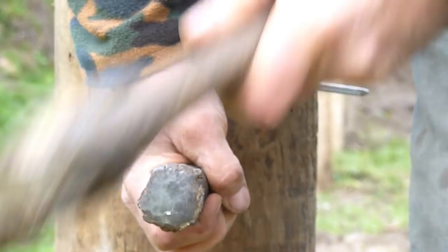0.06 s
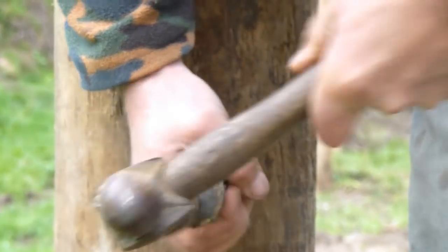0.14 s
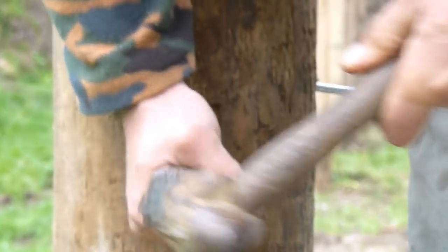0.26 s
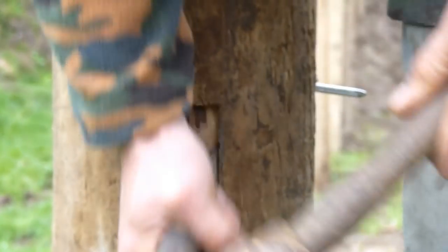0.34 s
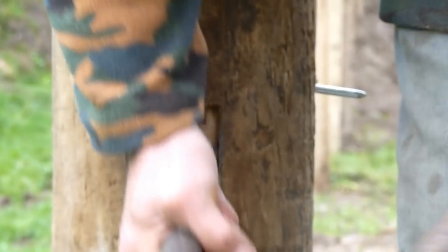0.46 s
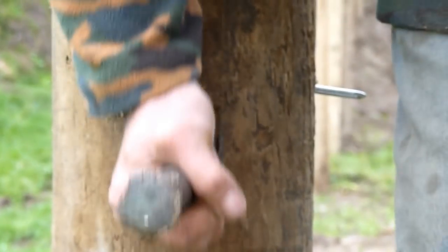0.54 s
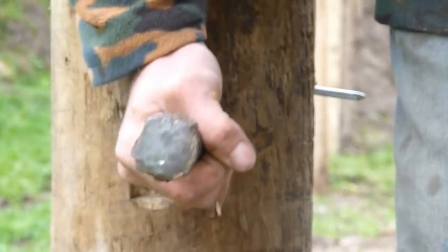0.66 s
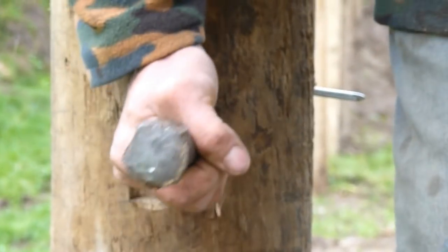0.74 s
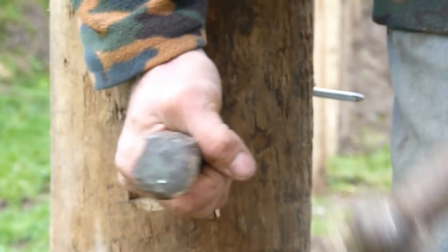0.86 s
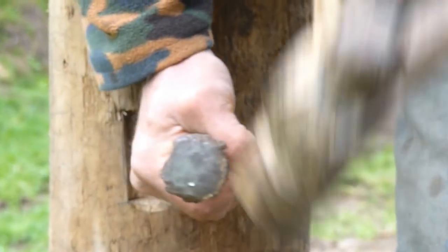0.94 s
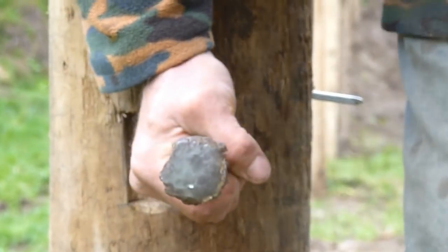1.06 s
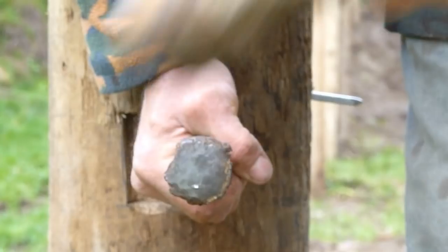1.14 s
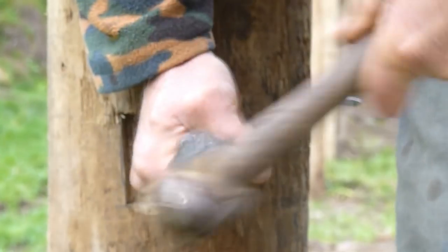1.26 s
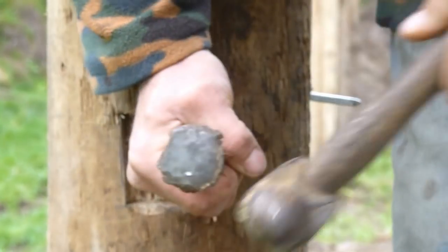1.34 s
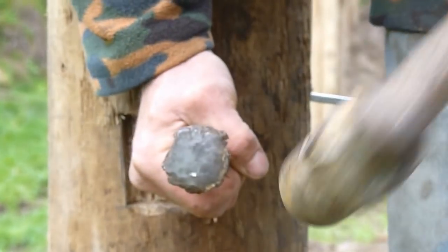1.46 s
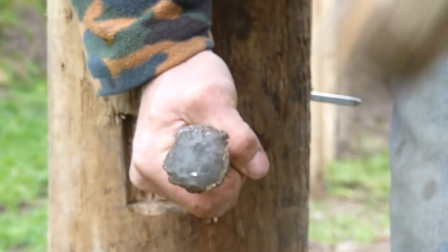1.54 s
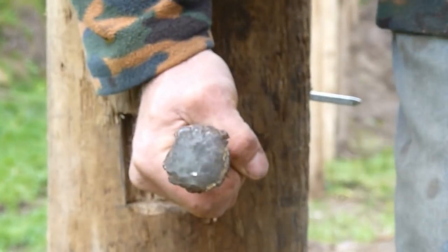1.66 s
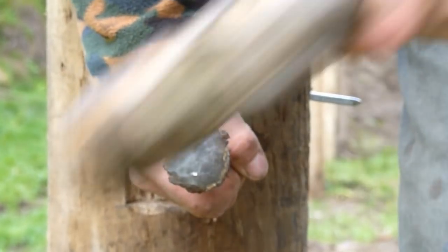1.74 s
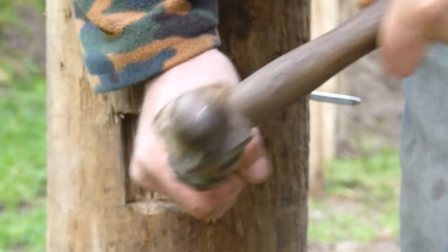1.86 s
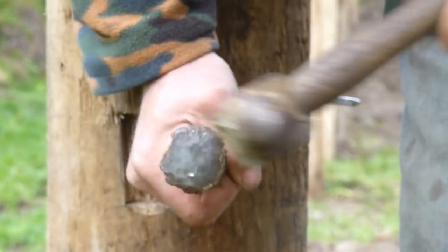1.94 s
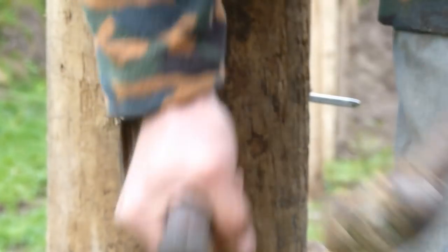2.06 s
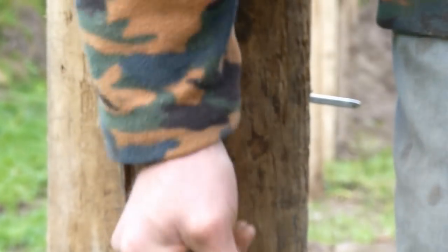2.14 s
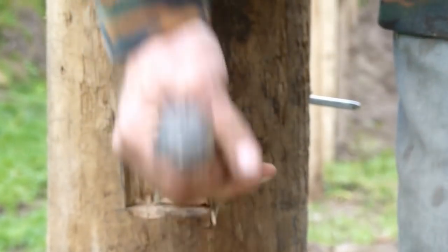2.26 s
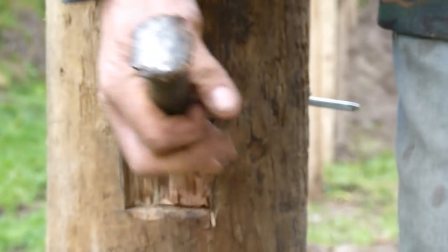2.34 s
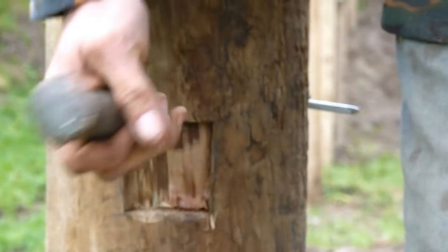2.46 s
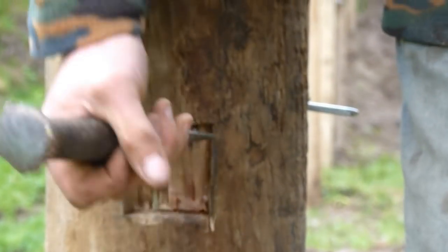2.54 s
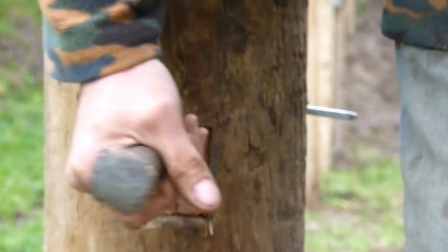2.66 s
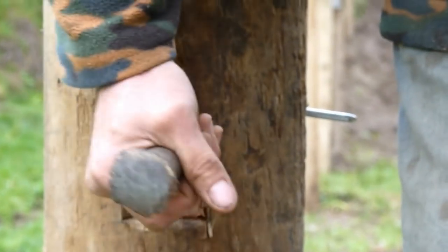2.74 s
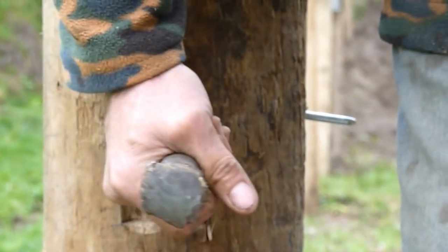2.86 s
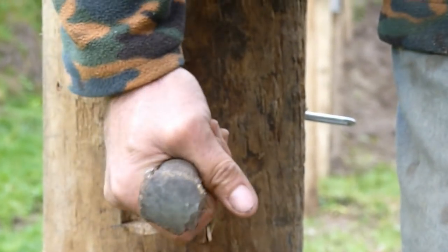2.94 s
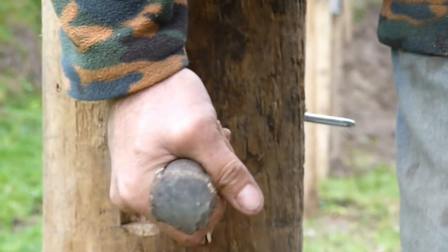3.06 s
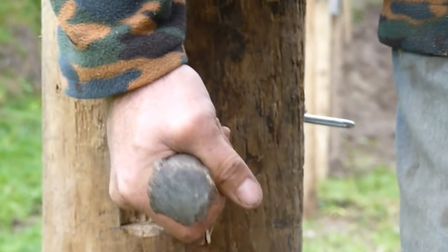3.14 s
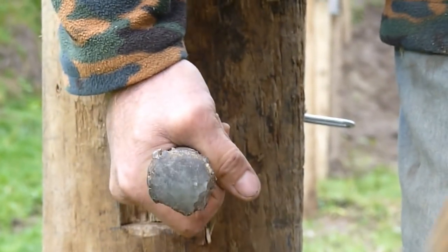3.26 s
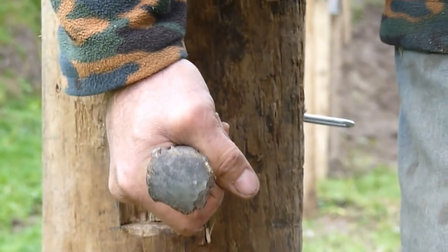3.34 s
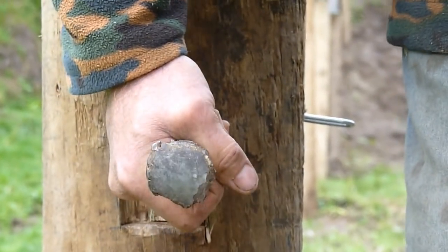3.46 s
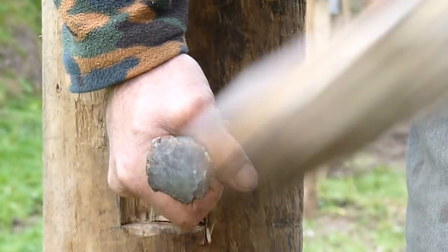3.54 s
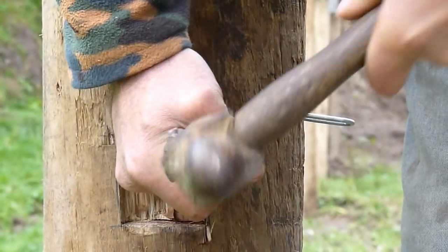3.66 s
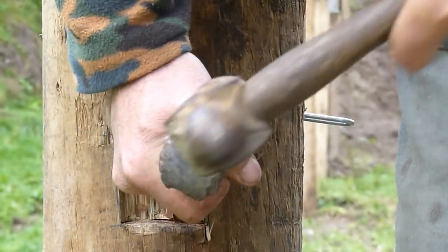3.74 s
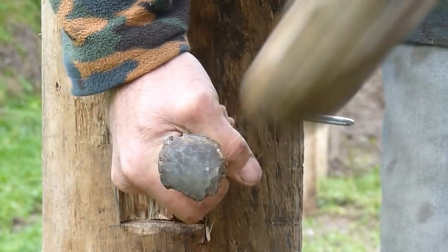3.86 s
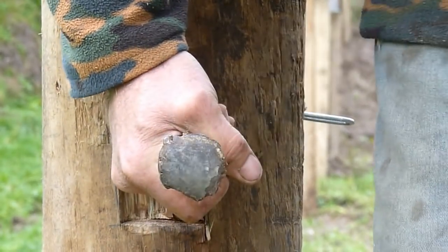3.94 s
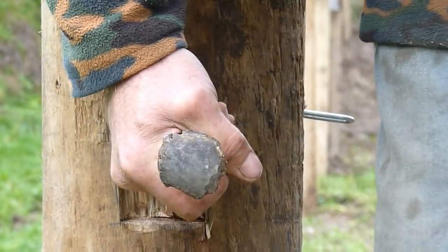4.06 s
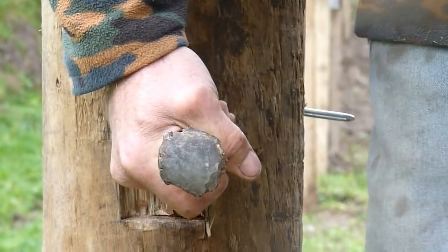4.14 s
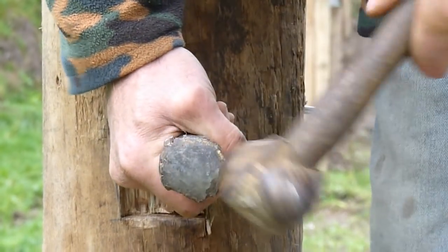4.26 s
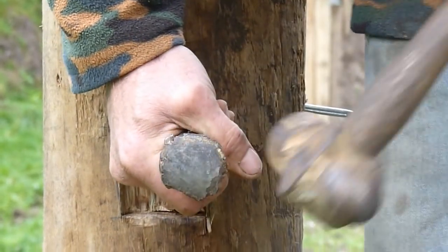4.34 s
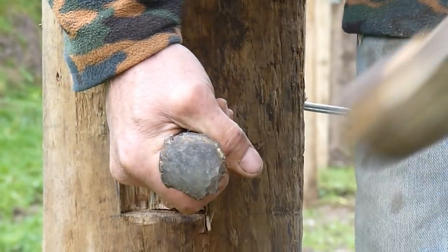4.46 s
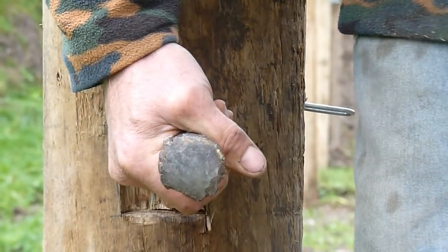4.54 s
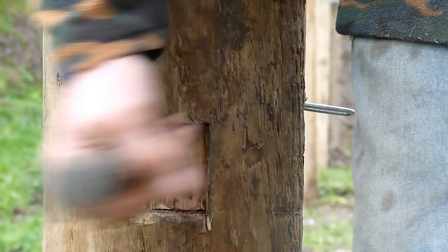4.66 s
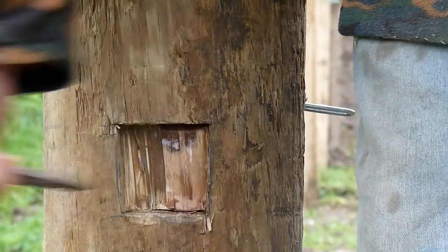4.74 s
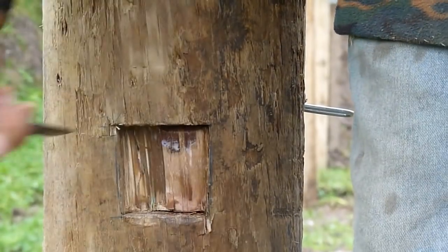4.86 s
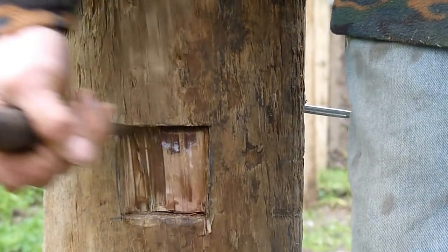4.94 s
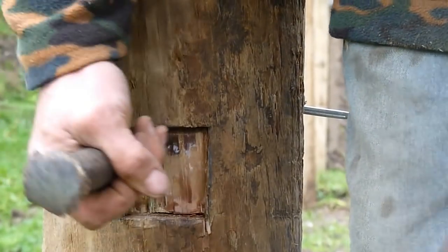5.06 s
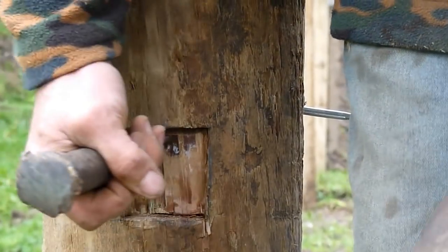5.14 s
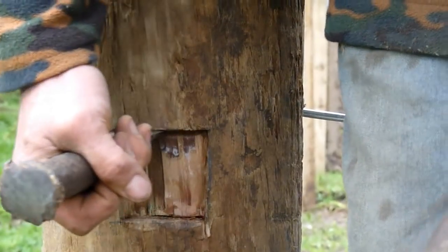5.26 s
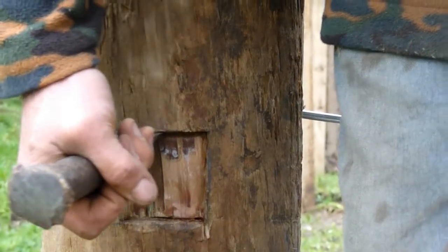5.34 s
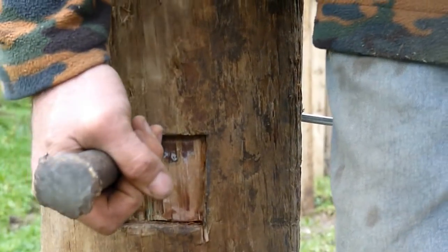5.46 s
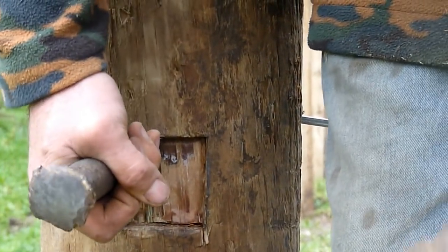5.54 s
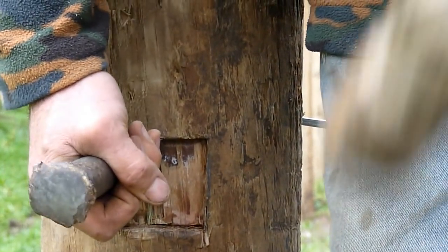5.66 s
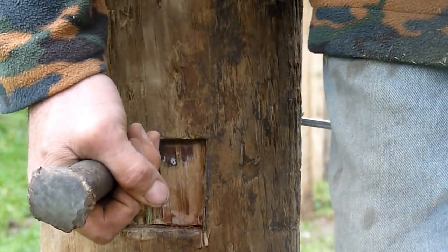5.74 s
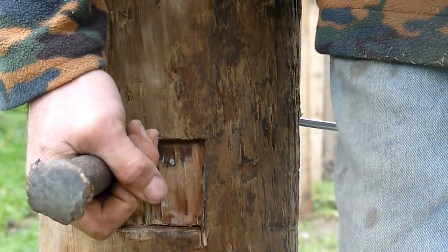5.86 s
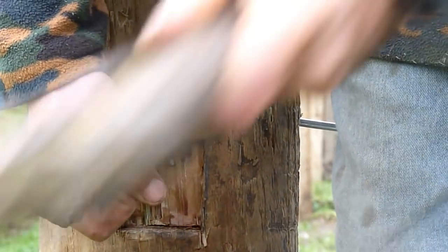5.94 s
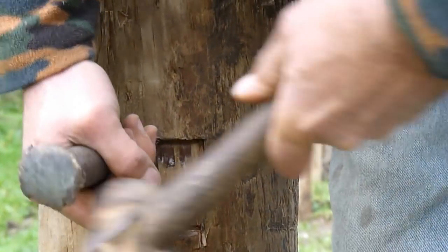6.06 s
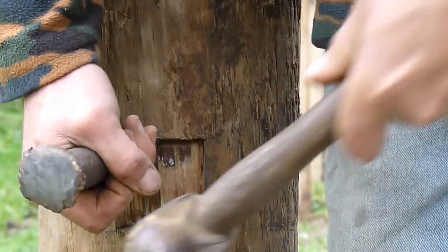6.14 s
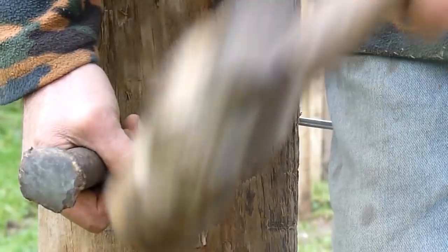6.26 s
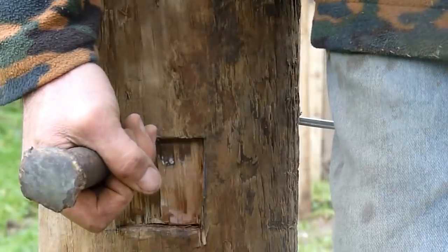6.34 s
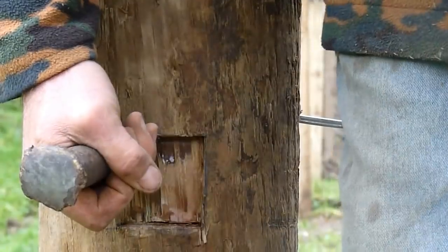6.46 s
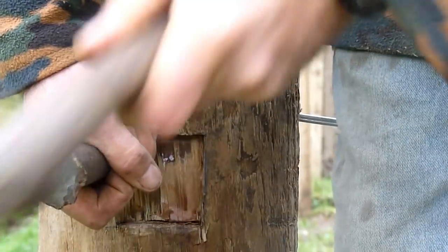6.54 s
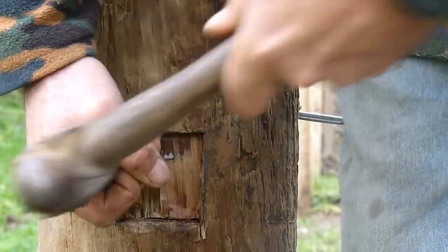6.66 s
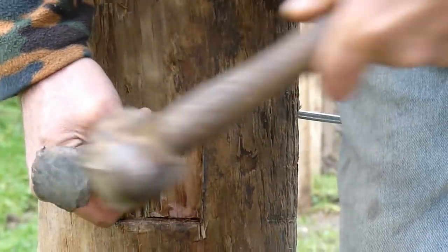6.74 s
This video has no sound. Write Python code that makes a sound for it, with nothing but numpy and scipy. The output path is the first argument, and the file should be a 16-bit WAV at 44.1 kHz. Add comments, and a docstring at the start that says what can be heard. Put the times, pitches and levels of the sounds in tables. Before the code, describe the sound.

Close to the microphone outdoors, a hammer strikes a steel chisel set in a timber post: three blows, two, then two more. Each is a sharp bright crack with a short metallic ring, woody knock and small rebound, followed by scattered yard echoes. In the gaps the blade scrapes and bumps lightly, sleeves rustle, and faint birds pip over a quiet distant wash and hiss.

```python
"""A hammer drives a hand-held steel chisel into a timber post, outdoors, close to a camera: three blows come first.
Each cracks, rings the steel, thumps, knocks the post and rebounds, while the yard answers with scattered echoes.
Then the blade scrapes and bumps back into the cut, sleeves rustle, and birds pip and whistle faintly.
Two blows, more rustling and resetting, and two last blows follow, all over a steady distant wash and hiss.
Sources are damped modes, shaped noise and gliding tones; loud peaks make the camera duck and clip."""
import sys
import numpy as np
from scipy import signal
from scipy.fft import rfft, irfft, next_fast_len
from scipy.io import wavfile
from scipy.ndimage import map_coordinates

SR = 44100
rng = np.random.default_rng(int(sys.argv[2]) if len(sys.argv) > 2 else 0)


def wrap_up_sound(samples):
    """Save the sound to the file named by the first command line argument, as 16-bit audio."""
    columns = np.atleast_2d(samples).T
    # keep every value between -1 and 1, then stretch to whole-number steps
    tamed = np.clip(columns, -1, 1)
    steps = np.round(tamed * 32767).astype(np.int16)
    wavfile.write(sys.argv[1], SR, steps)


N = 299439  # samples


def amp(db):
    """Decibels to gain."""
    return 10 ** (np.asarray(db) / 20)


def unit(x):
    """Scale to rms 1."""
    return x / np.sqrt(np.mean(x ** 2) + 1e-20)


def along(points, hz):
    """Read (frequency, value) points on a log frequency axis."""
    f, v = np.transpose(points)
    return np.interp(np.log(hz + 1), np.log(f), v)


def wobble(rate):
    """A smooth random curve with rate knots a second."""
    knots = rng.standard_normal(int(N * rate / SR) + 4)
    return map_coordinates(knots, [np.arange(N) * rate / SR])


def filtered(x, response):
    """Filter x by a complex response of frequency, zero-padded against wrap-around."""
    n = x.shape[-1]
    padded = next_fast_len(n + SR // 5)
    spectrum = rfft(x, padded) * response(np.fft.rfftfreq(padded, 1 / SR))
    return irfft(spectrum, padded)[..., :n]


def noise(spectrum, n, side):
    """Coloured stereo noise of rms 1; the side curve sets how far the channels differ at each frequency."""
    def colour(hz):
        side_db = np.array([0 * hz, along(side, hz)])
        return amp(along(spectrum, hz) + side_db)

    mid, apart = filtered(rng.standard_normal((2, n)), colour)
    return unit(np.array([mid + apart, mid - apart]))


def add(track, start_s, sound):
    """Mix a sound into a track, cutting it at the track's end."""
    part = track[:, round(start_s * SR):][:, :sound.shape[-1]]
    part += sound[..., :part.shape[1]]


# stereo spread of the work close by: pitch_hz, side_minus_mid_db
WORK_WIDTH = [(100, -17), (1000, -18.5), (2100, -9.5), (2900, 1.5), (6000, -4.5), (9000, -2.5), (14000, -4)]


def ring(modes, t, pitch=1, blur=0):
    """Damped modes vary in strength and tuning at each contact; blur widens each line by a share of its pitch."""
    out = np.zeros((2, len(t)))
    for k, (hz, db, t60) in enumerate(modes):
        size_db, detune, way = rng.normal(0, [1.2, .004, 1])
        # a random walk in phase widens the line
        drift = np.cumsum(rng.standard_normal(len(t))) * np.sqrt(2 * np.pi * blur * hz / SR)
        # opposite phase offsets in the two channels give the mode its width
        offsets = np.sign(way) * np.arctan(amp(along(WORK_WIDTH, hz))) * np.array([[1], [-1]])
        envelope = amp(db + size_db - 60 * t / t60)
        phase = 2 * np.pi * hz * pitch * (1 + detune) * t + drift + offsets
        out += (-1) ** k * envelope * np.sin(phase)
    return out


# hammer blows, relative levels: start_s, force_db, ring_db (how squarely the face lands),
# bite_db (how deep the edge goes), thump_db (a low thump), rebound_db
HAMMER_BLOWS = [(0.1542, -1, -3.5, -0.5, -29.5, -17), (1.2968, 0.5, -2.5, 3, -21, -23),
                (1.858, -3, -11, 2, -13, -16), (3.672, -1.5, 5, -1.5, -15.5, -15),
                (4.2524, -1, -9, 2, -13, -25.5), (6.0484, 1, -1.5, -1, -16.5, -22.5),
                (6.628, 0, -4.5, -2.5, -15.5, -13.5)]
BEND_DB, HIGH_DB, SING_DB = -1.5, -1, -1  # ringing parts of an ordinary blow
# a deep bite grips the blade; a square hit softens the high rings and sings on (dB per dB)
GRIP_PER_BITE, SPARE_PER_RING, SING_PER_RING = 1, 0.52, 0.98
LOW_SING_DB = 4.5  # the lowest lasting ring, over the bending modes
RING_SPREAD_DB, YARD_DB = -7, 5  # share of the ringing that reaches the yard; the yard's answer
REBOUND_S, SETTLE_S = 0.028, 0.027  # the chisel's first flight, and the second


def hammering():
    """Steel meets steel, the edge splits wood, the post knocks, and the chisel falls back into the cut twice."""
    out, t = np.zeros((2, N)), np.arange(SR * 3 // 4) / SR
    for start_s, force_db, ring_db, bite_db, thump_db, rebound_db in HAMMER_BLOWS:
        # the landing of the face and the grip of the cut decide which rings speak
        bend_db = BEND_DB - GRIP_PER_BITE * bite_db
        high_db = HIGH_DB - SPARE_PER_RING * ring_db
        sing_db = SING_DB + SING_PER_RING * ring_db
        ringing = blow_ring(t, bend_db, ring_db, high_db)
        singing = shimmer(t, [bend_db + LOW_SING_DB, sing_db, high_db])
        post = post_knock(t)
        crack = splitting_crack(t)
        fibres = snapping_fibres(t)
        close = ringing + singing + post + thump(t, thump_db) + crack + amp(bite_db) * fibres
        add(out, start_s, amp(force_db + 0.5) * close)

        sent = 2 * fibres + (crack + post + amp(RING_SPREAD_DB) * ringing) / 2
        answer = amp(YARD_DB) * yard(sent)
        add(out, start_s, amp(force_db) * answer)

        rebound_s = start_s + REBOUND_S
        add(out, rebound_s, amp(rebound_db + 10) * rebound(t))
        settling = ring(BLADE_KNOCK, t) * (1 - np.exp(-t / 0.0036))
        add(out, rebound_s + SETTLE_S, amp(rebound_db - 9.5) * settling)
    return out


# the chisel's low bending modes: pitch_hz, level_db (relative), t60_s
BENDING_MODES = [(1124, -11.5, 0.075), (1779, 0.5, 0.013), (2028, -3, 0.028), (3440, -17.5, 0.12),
                 (3700, -7, 0.036)]
# its bright modes, damped by the fist and the cut: pitch_hz, level_db (relative), t60_s
BRIGHT_MODES = [(5834, -4.5, 0.016), (5960, -6.5, 0.043), (6330, 0, .045)]
# the highest rings of the blow, the lowest of them a short ring from the camera's notch:
# pitch_hz, level_db (relative), t60_s
HIGH_RINGS = [(7810, -15.5, 0.028), (8640, -19, 0.02), (8870, -5.5, 0.011), (9670, -16.5, 0.0067),
              (10790, -12, 0.039), (14260, -15.5, 0.013)]
SEIZE_S, SEIZE_SPREAD_S, SEIZE_DB = 0.013, 0.0025, -5


def blow_ring(t, bend_db, bright_db, high_db):
    """Damped modes of the chisel and the highest rings; all drop as fist and cut seize the steel after the blow."""
    bending = amp(bend_db) * ring(BENDING_MODES, t, blur=0.014)
    bright = amp(bright_db) * ring(BRIGHT_MODES, t)
    high = amp(high_db) * ring(HIGH_RINGS, t, blur=0.0057)
    seized = (1 + np.tanh((t - SEIZE_S) / SEIZE_SPREAD_S)) / 2
    return (bending + bright + high) * amp(SEIZE_DB * seized)


# wood fibres parting under the edge: pitch_hz, density_db (relative, per Hz)
SPLIT_COLOUR = [(30, -21.5), (150, -20), (600, 2), (1500, -2), (2800, -3.5), (4000, -6.5), (6000, -1),
                (10000, -1), (11500, -14.5), (15000, -6.5)]


def splitting_crack(t):
    """Wood splits in an instant burst of noise that falls 60 dB in 26 ms."""
    return amp(2 - 60 * t / 0.026) * noise(SPLIT_COLOUR, len(t), WORK_WIDTH)


def snapping_fibres(t):
    """Fibres snap in uneven clumps, duller and longer than the first crack."""
    clumps = unit(amp(3 * wobble(700)[:len(t)]))
    snaps = clumps * noise(SPLIT_COLOUR, len(t), WORK_WIDTH)
    duller = signal.lfilter(*signal.butter(2, 13000, fs=SR), snaps)
    return amp(-12.5 - 60 * t / 0.079) * duller


# the post's modes: pitch_hz (before tuning), level_db (relative), t60_s
POST_MODES = [(226, -14.5, 0.037), (296.8, -11.5, 0.044), (385, -9.5, 0.037), (503, -12, 0.047),
              (739, -13, .02), (840, -19.5, 0.0057)]
POST_PITCH, POST_DB = 1.05, 2  # tuning ratio; level in an ordinary blow


def post_knock(t):
    """The heavy post takes a few milliseconds to get moving, then rings briefly."""
    return amp(POST_DB) * ring(POST_MODES, t, POST_PITCH) * (1 - np.exp(-t / 0.004))


def thump(t, thump_db):
    """A low thump: a single pulse peaking after 1 ms."""
    return amp(thump_db) * t / .001 * np.exp(-t / .001)


# faint lasting ring of the steel: pitch_hz, level_db (relative), t60_s (before the echo swells)
SINGING_BANDS = [(1110, -55, .8), (6470, -45, .9), (10570, -61, .6)]
RETURN_DB = 9  # the lasting ring's lift over the echo curve


def shimmer(t, levels_db):
    """The lasting ring comes back scattered as narrow noise bands, swelling with the yard's answer."""
    out = 0
    skirts = [(.8, -90), (.955, -18), (1, 0), (1.045, -16), (1.25, -90)]  # pitch ratio, dB
    for (hz, db, t60), level_db in zip(SINGING_BANDS, levels_db):
        band = [(hz * ratio, level) for ratio, level in skirts]
        out = out + amp(db + level_db - 60 * t / t60) * noise(band, len(t), WORK_WIDTH)
    return amp(RETURN_DB + echo_db(t)) * out


# the blade pressed on wood: pitch_hz, level_db (relative), t60_s (before each contact's own shaping)
BLADE_KNOCK = [(300, -5.5, 0.016), (437, 0, 0.018), (560, -3.5, .014), (1150, -24.5, 0.056)]


def rebound(t):
    """A soft, slightly rattling contact wakes mostly the low modes of wood and steel."""
    modes = ring(BLADE_KNOCK, t, blur=.1) + amp(-1) * ring(BENDING_MODES, t, blur=.09)
    softened = modes * (1 - np.exp(-t / .004)) * amp(-60 * t / 0.11)
    return signal.lfilter(*signal.butter(2, 1300, fs=SR), softened)


# near and far surfaces that return the sound: delay_s, level_db (relative), fade_db_per_s
ECHO_SURFACES = [(0.105, -6.5, 57.5), (0.3, -4.5, 14)]
SCATTER_DB, ECHO_RISE_DB = -14.5, 42  # the ground's even scatter; an echo's climb over its own delay


def echo_db(t):
    """Level of the returning sound: even scatter, and a swell from each reflector."""
    swells = []
    for delay, db, fade in ECHO_SURFACES:
        before, after = ECHO_RISE_DB * (1 - t / delay), fade * (t - delay)
        swells.append(db - np.maximum(before, after))
    return 10 * np.log10(amp(SCATTER_DB) ** 2 + np.sum(amp(swells) ** 2, axis=0))


# the yard's decay, before the echo swells: pitch_hz, t60_s
YARD_DECAY = [(200, 0.39), (1100, 0.89), (3500, 1), (6400, 0.77), (10000, 0.53), (14000, 0.26)]
# colour of the echo: pitch_hz, level_db (relative)
ECHO_COLOUR = [(100, -14), (600, -4), (1200, -2), (2000, -0.5), (2700, -8), (3600, 3), (5000, -7),
               (6200, 1.5), (7500, -10.5), (10500, 2.5), (12000, -10), (16000, -15.5)]
# stereo spread of the surroundings: pitch_hz, side_minus_mid_db
AIR_WIDTH = [(60, -18), (110, -17), (200, -21.5), (380, -21), (700, -11), (1290, -9), (2380, -2),
             (4400, -0.5), (8120, 1), (15000, 5)]


def yard(blow):
    """Ground and fence scatter a blow at once; trees and walls answer later: convolution with shaped noise."""
    scatter = noise([(20, 0.0029), (20000, 0.015)], SR, AIR_WIDTH)  # practically white in the mid
    hz, t, grains = signal.stft(scatter, SR, nperseg=256)
    decay_db = along(ECHO_COLOUR, hz)[:, None] - 60 * t / along(YARD_DECAY, hz)[:, None] + echo_db(t)
    tail = signal.istft(grains * amp(decay_db), SR, nperseg=256)[1] / np.sqrt(SR)
    return signal.fftconvolve(blow.mean(axis=0)[None], tail, axes=1)


# blade and hand touching the post: start_s, knock_db (relative),
# speed_ratio (slows both pitch and decay of the modes), scrape_db (relative)
BLADE_TOUCHES = [(2.063, -45.5, 0.86, -49), (2.652, -45, 0.46, -62), (2.675, -54, 0.38, -44),
                 (2.769, -47.5, 0.89, -60), (5.114, -55.5, 0.17, -51), (5.205, -45, 0.94, -46.5),
                 (5.2465, -23.5, 0.96, -46)]


def touches():
    """The edge bumps (damped modes) and scrapes (fading noise) as it is set back into the mortise."""
    out, t = np.zeros((2, N)), np.arange(SR // 8) / SR
    # pitch_hz, density_db
    scrape_colour = [(300, 21.5), (2500, 0), (3600, 15.5), (4500, 0), (6000, 8), (14000, 0.5)]
    for start_s, knock_db, speed, scrape_db in BLADE_TOUCHES:
        knock = ring(BLADE_KNOCK, t * speed) * (1 - np.exp(-t / 0.00077))
        scrape = amp(-60 * t / 0.066) * noise(scrape_colour, len(t), WORK_WIDTH)
        add(out, start_s, amp(knock_db + 6.5) * knock + amp(scrape_db - 5) * scrape)
    return out


# arm movements that rustle the sleeves: middle_s, length_s, level_db (before the unevenness)
ARM_MOVES = [(1.2, 0.28, -61), (2.605, 0.57, -66), (4.665, 0.22, -53.5), (5.03, 0.45, -56.5)]
# rustling cloth: pitch_hz, density_db (relative, per Hz)
CLOTH_COLOUR = [(59, -31), (100, -7), (130, -2), (477, -0.5), (595, -2.5), (2020, -9.5), (2620, -22),
                (3470, -18.5), (12000, -30.5), (15600, -61.5), (22000, -120)]
FIDGET_DB = -66  # clothes between the movements, before the unevenness


def clothes():
    """Cloth rubs as unevenly flickering noise, swelling with each arm movement."""
    t = np.arange(N) / SR
    power = amp(FIDGET_DB) ** 2
    for middle_s, length_s, db in ARM_MOVES:
        power = power + amp(db) ** 2 * np.exp(-(2 * (t - middle_s) / length_s) ** 2)
    return np.sqrt(power) * amp(2.1 * wobble(33)) * noise(CLOTH_COLOUR, N, AIR_WIDTH)


# a far bird's run of pips
PIPS_FROM_S, PIPS_TO_S, PIP_GAP_S, PIP_SCATTER_S = 2.28, 3.5, 0.095, 0.015
PIP_HZ, PIP_S, PIP_DB, PIP_SPREAD_DB = 1487, 0.02, -64.5, 1.5
# another bird, one note: start_s, pitch_hz (mid-note), length_s, level_db
THIN_WHISTLE = (2.71, 3900, 0.1, -68)


def birds():
    """A loose run of faint short pips and one thin whistle: sine tones, each sagging a little in pitch."""
    out = np.zeros((2, N))
    notes = [THIN_WHISTLE]
    for start_s in np.arange(PIPS_FROM_S, PIPS_TO_S, PIP_GAP_S):
        late, loud = rng.standard_normal(2)
        notes.append((start_s + PIP_SCATTER_S * late, PIP_HZ, PIP_S, PIP_DB + PIP_SPREAD_DB * loud))
    for start_s, hz, length_s, db in notes:
        u = np.linspace(0, 1, round(length_s * SR))
        phase = 2 * np.pi * np.cumsum(hz * (1 - 0.019 * (u - .5))) / SR
        add(out, start_s, amp(db) * np.sin(np.pi * u) * np.sin(phase))
    return out


# the distant wash and hiss: pitch_hz, density_db (relative, per Hz)
AIR_COLOUR = [(15, -69), (25, -34.5), (114, -10), (301, -4), (476, -13.5), (516, -9), (796, -14.5),
              (1480, -14.5), (2220, -22), (2610, -29.5), (3720, -21.5), (4610, -34), (5430, -25.5),
              (12200, -34.5), (16000, -41)]


def outdoors():
    """A distant wash and hiss: coloured noise, steady but for a slight slow drift in level."""
    return amp(-58.0 + 0.49 * wobble(4.9)) * noise(AIR_COLOUR, N, AIR_WIDTH)


def scene():
    """The work close by, the yard around it."""
    return hammering() + touches() + clothes() + birds() + outdoors()


def gain_control(x, threshold_db, attack_s, recovery_db_per_s):
    """Peaks over the threshold pull the gain down; it recovers at a steady rate in dB."""
    over = np.maximum(20 * np.log10(np.abs(x).max(axis=0) + 1e-9) - threshold_db, 0)
    ramp = recovery_db_per_s * np.arange(N) / SR
    held = np.maximum.accumulate(over + ramp) - ramp
    pole = np.exp(-1 / (attack_s * SR))
    return x * amp(-signal.lfilter([1 - pole], [1, -pole], held))


# narrow dips in the camera's response: pitch_hz, width_hz
RESPONSE_DIPS = [(2600, 170), (4620, 360), (7900, 220)]
TOP_HZ = 16050  # steep upper limit


def record(dry):
    """Notched response, gain control too slow for the first milliseconds, clipping, band limits."""
    def dips(f):
        return np.prod([(c * c - f * f) / (c * c - f * f + 1j * f * w) for c, w in RESPONSE_DIPS], axis=0)

    def treble_limit(hz):
        return 1 / np.sqrt((1 + (hz / 14800) ** 30) * (1 + (hz / TOP_HZ) ** 120))

    notched = filtered(dry, dips)
    ducked = gain_control(notched, threshold_db=0.0, attack_s=0.0036, recovery_db_per_s=37.5)
    clipped = np.clip(ducked, -.92, .92)
    centred = signal.lfilter(*signal.butter(1, 4, "highpass", fs=SR), clipped)
    return filtered(centred, treble_limit)


dry = scene()
out = record(dry)
wrap_up_sound(out)
```